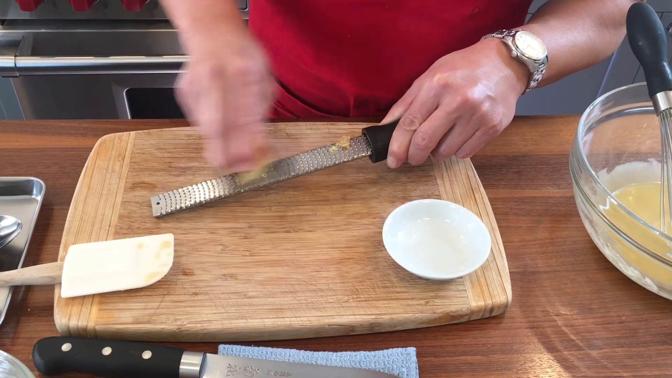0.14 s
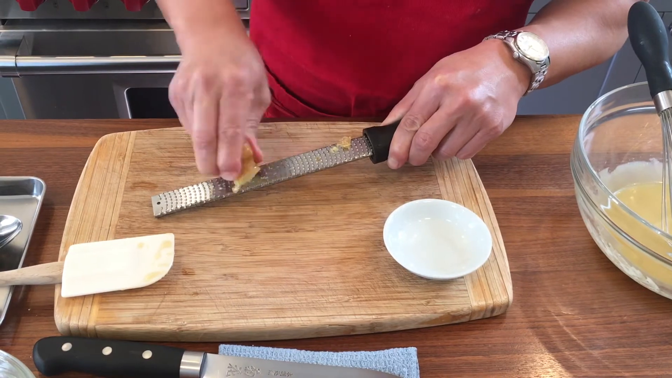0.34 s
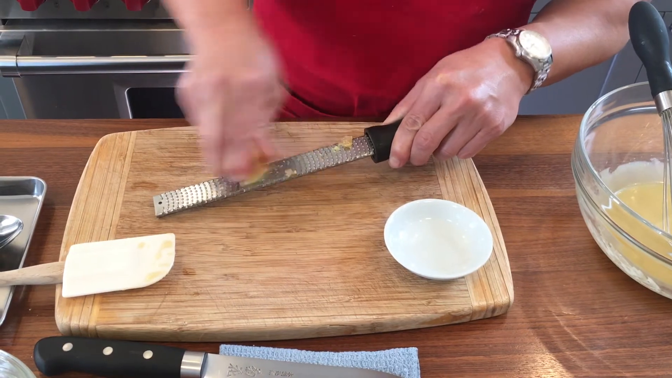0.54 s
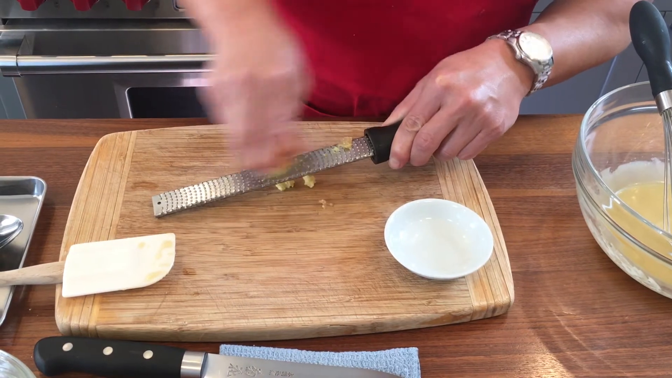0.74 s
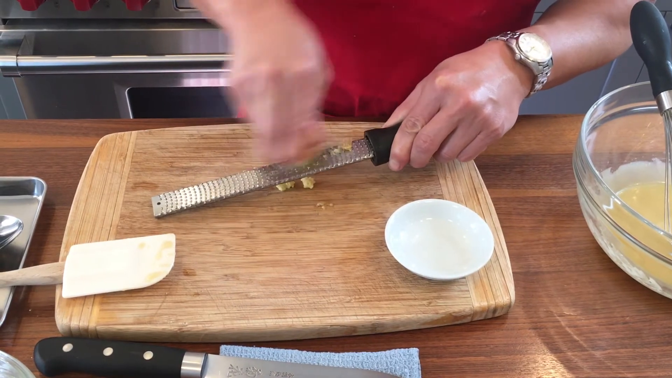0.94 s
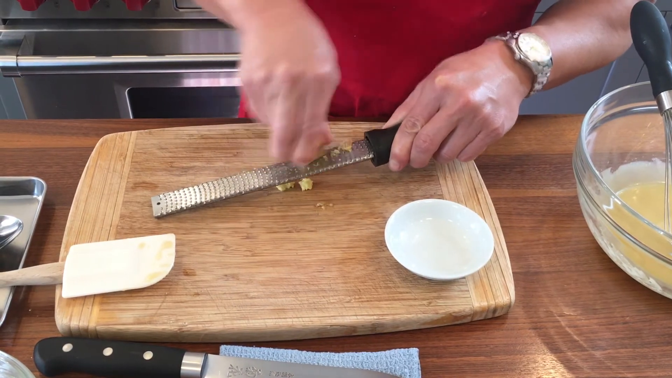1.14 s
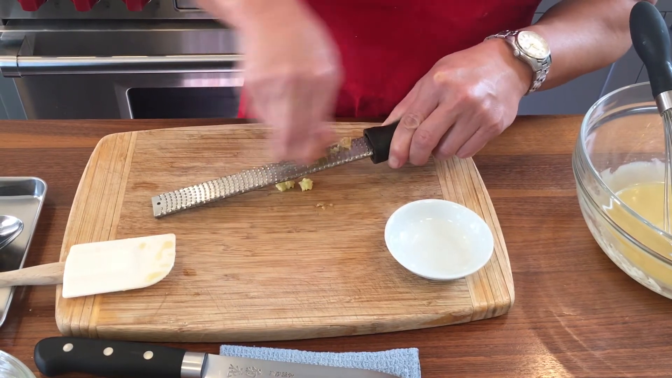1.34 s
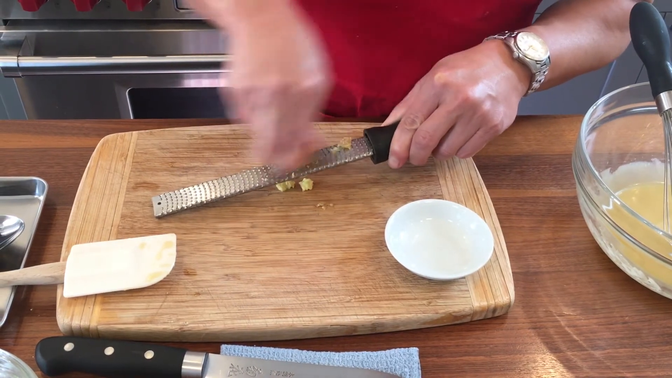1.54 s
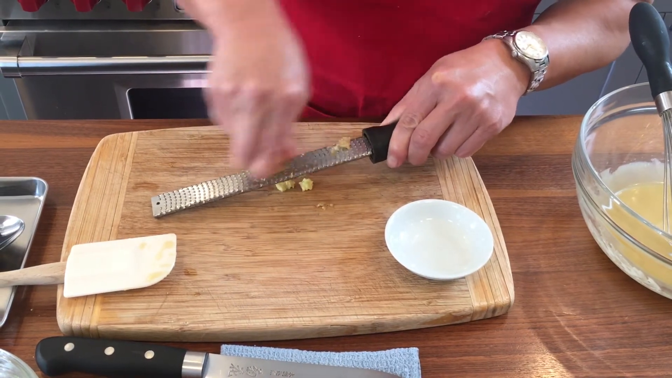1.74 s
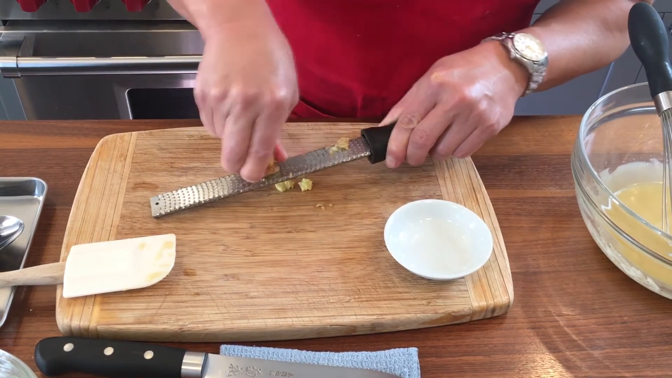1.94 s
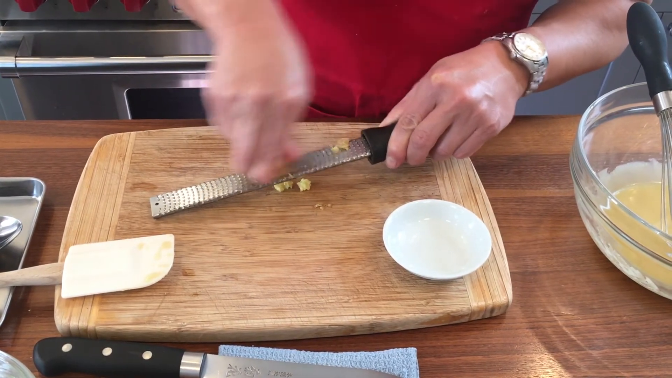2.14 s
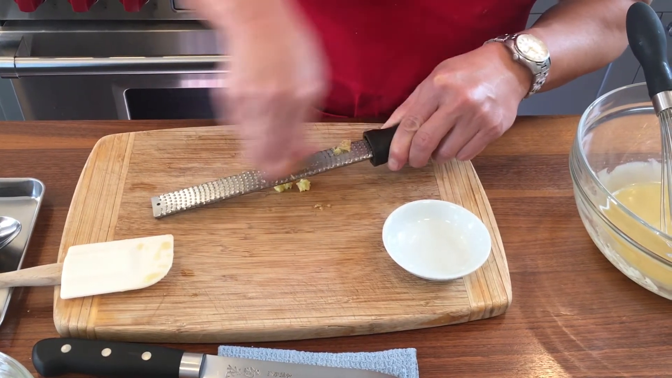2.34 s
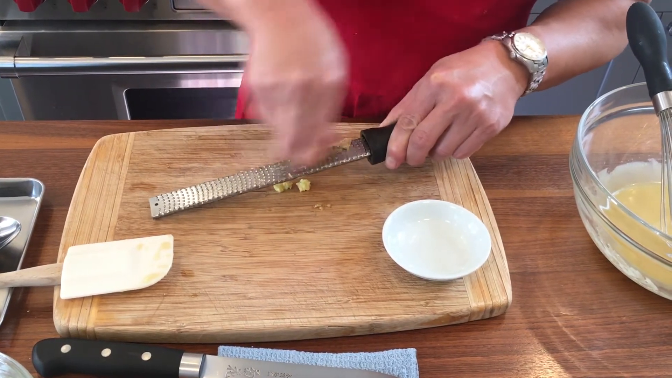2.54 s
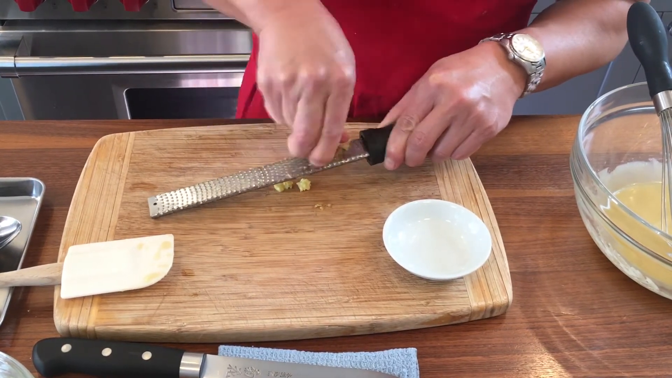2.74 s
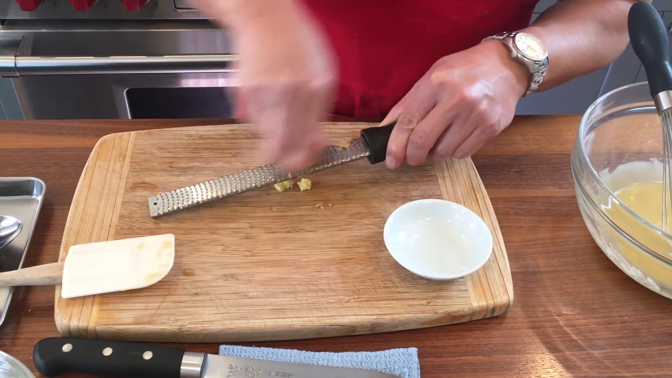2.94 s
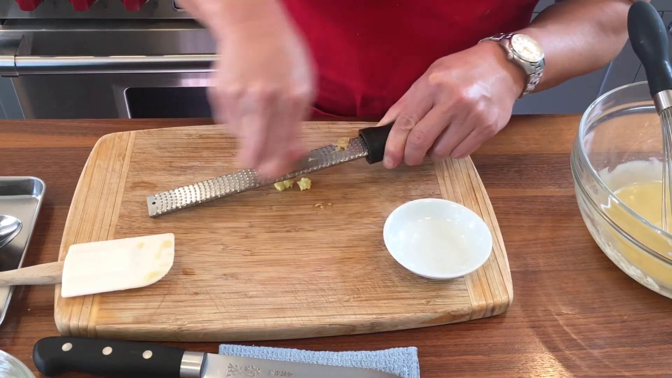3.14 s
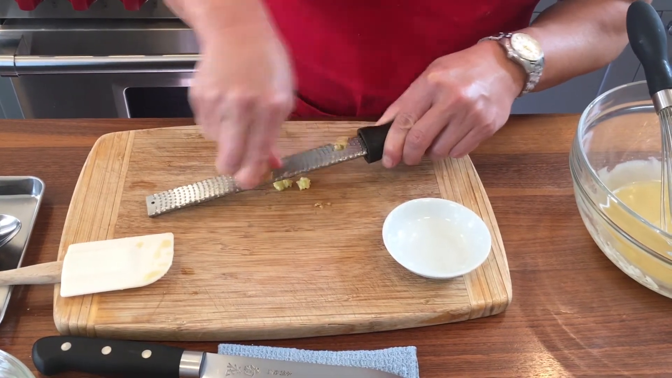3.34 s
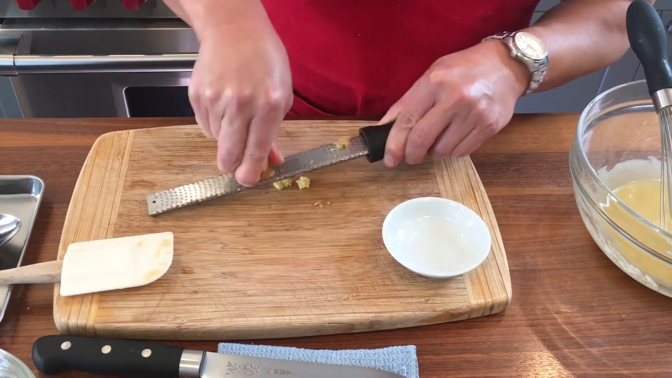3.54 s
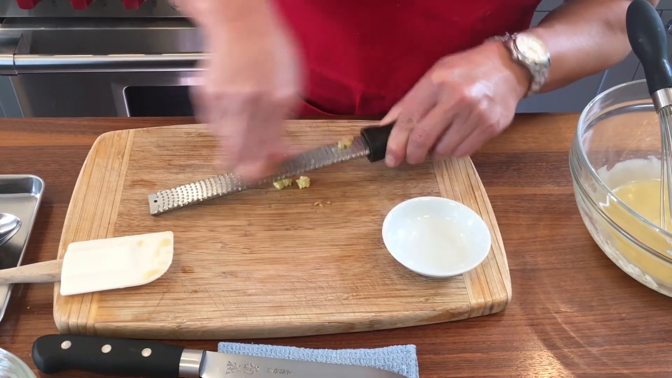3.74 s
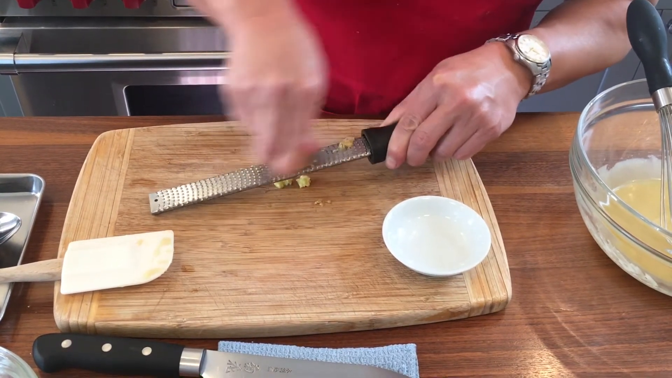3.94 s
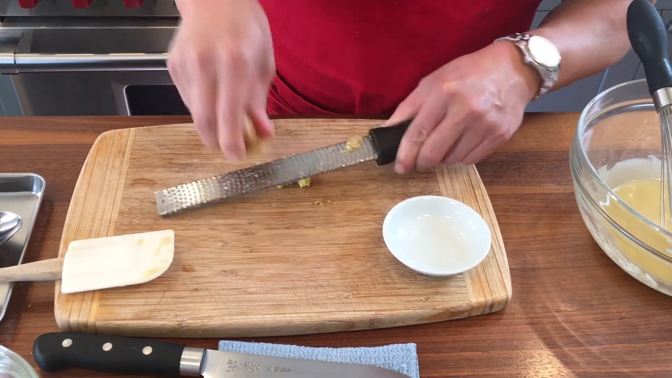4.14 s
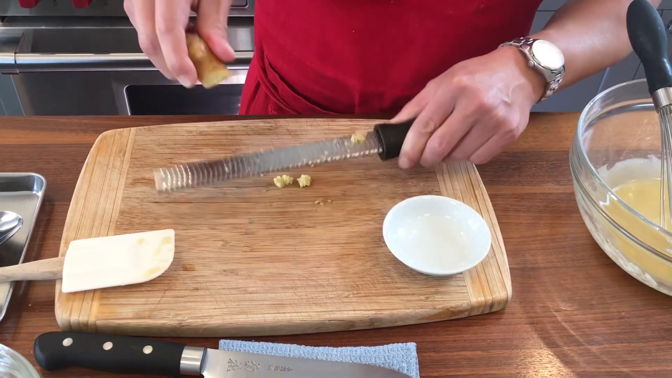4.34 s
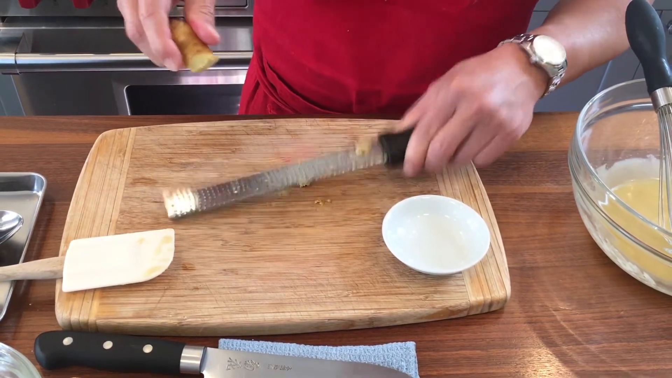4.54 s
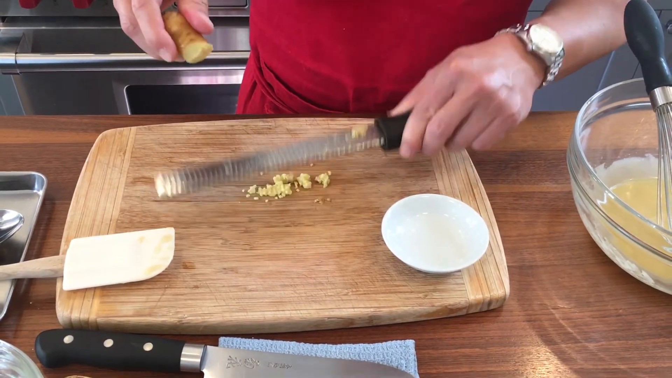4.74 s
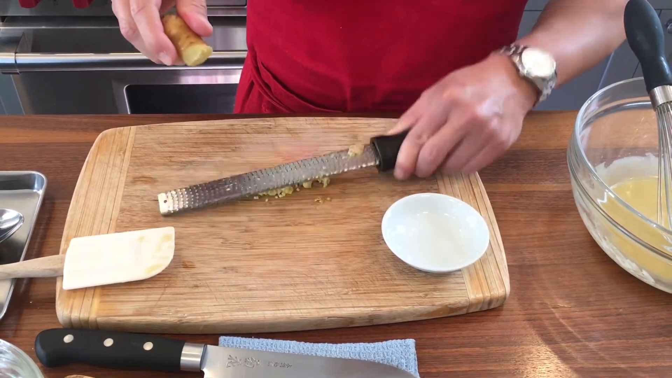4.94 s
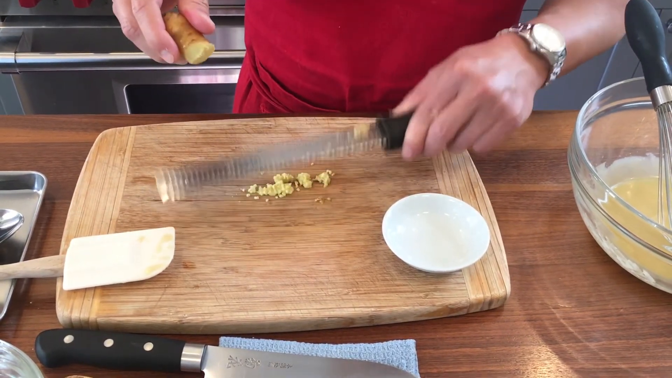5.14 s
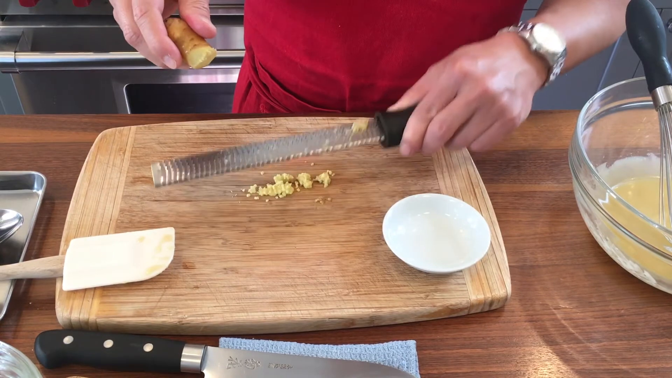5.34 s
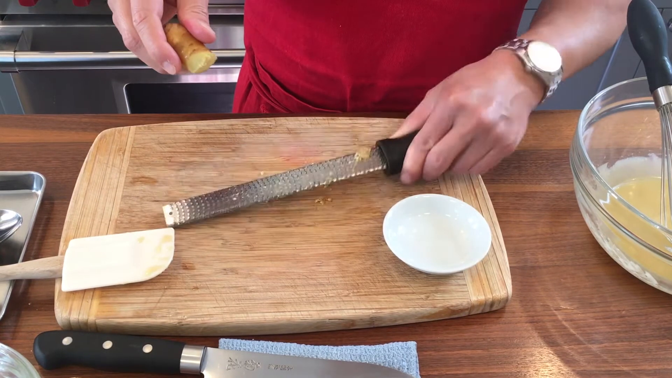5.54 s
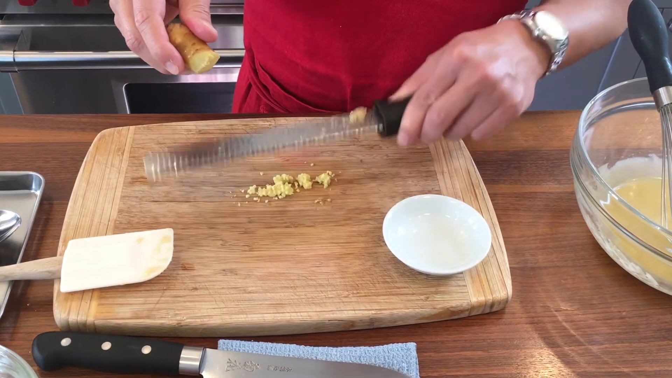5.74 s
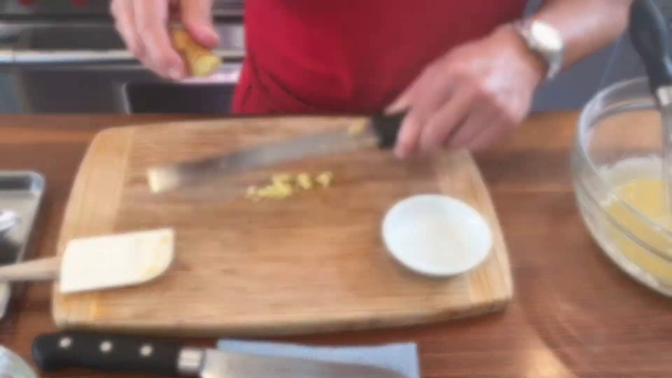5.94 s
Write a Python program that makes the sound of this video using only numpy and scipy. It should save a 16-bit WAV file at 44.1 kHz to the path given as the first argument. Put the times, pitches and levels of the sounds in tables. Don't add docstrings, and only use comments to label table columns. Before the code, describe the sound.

In a hard-walled kitchen, quick raspy grating strokes gradually dull, stop, and give way to six loud, evenly spaced woody clacks.

```python
import sys
import numpy as np
from scipy import signal
from scipy.fft import rfft, irfft
from scipy.io import wavfile
from scipy.ndimage import uniform_filter1d

SR = 44100
rng = np.random.default_rng(int(sys.argv[2]) if len(sys.argv) > 2 else 0)


def nominal_scale(level):
    x = np.asarray(level, float) / 20
    return 10 ** x


def store_pcm(level_fs):
    pcm = np.round(np.clip(level_fs, -1, 1) * 32767).astype(np.int16)
    wavfile.write(sys.argv[1], SR, np.atleast_2d(pcm).T)


N = 269010
T = np.arange(N) / SR
HALF = SR // 2


def evened(x):
    return x / np.sqrt(np.mean(x ** 2) + 1e-20)


def drift(samples):
    once = uniform_filter1d(rng.standard_normal(N), samples)
    return evened(uniform_filter1d(once, samples))


def read(points, hz):
    f, value = np.transpose(points)
    return np.interp(np.log(hz + 1), np.log(f + 1), value)


def stroke(start, length, rise_s, fall_s):
    edges = np.clip([(start - T) / rise_s, (T - start - length) / fall_s], -50, 50)
    return (1 / (1 + np.exp(edges))).prod(0)


def resonate(x, hz, width):
    turn = np.exp(2j * np.pi * np.cumsum(hz * np.ones(N)) / SR)
    r = np.exp(-np.pi * width / SR)
    smooth = signal.lfilter([(1 - r) ** 2], [1, -2 * r, r * r], x / turn)
    return 2 * (turn * smooth).real


def bank(x, peaks):
    total = np.zeros(N)
    for k, (hz, width, db) in enumerate(peaks):
        flicker_db = 2.5 * drift(600)
        total += (-1) ** k * nominal_scale(db + flicker_db) * resonate(x, hz, width)
    return evened(total)


def rung(modes, spread_db):
    hz, db, t60 = np.transpose(modes)[:, :, None]
    db = db + spread_db * rng.standard_normal(db.shape)
    t60 = np.minimum(t60, np.minimum(.2, 270 / hz))
    t = T[:HALF]
    ring = (nominal_scale(db - 60 * t / t60) * np.sin(2 * np.pi * hz * t)).sum(0)
    return ring / np.linalg.norm(ring)


def coloured(points):
    log_gain = np.log(nominal_scale(read(points, abs(np.fft.fftfreq(4096, 1 / SR)))))
    click = np.fft.ifft(np.exp(np.conj(signal.hilbert(log_gain)))).real[:2048]
    return click / np.linalg.norm(click)


def room_air():
    # frequency in Hz, level in dB per Hz.
    floor = [(20, -41), (40, -9), (60, -3.5), (90, -24.5), (130, -9), (200, -8), (420, -14.5), (520, -24.5),
             (800, -27), (2000, -30.5), (3000, -39.5), (5000, -39), (10000, -44.5), (16000, -49)]
    frames, hz = N // 512 + 5, np.fft.rfftfreq(2048, 1 / SR)
    a, b, patches = rng.standard_normal((frames, 1025, 3)).T
    patches = evened(uniform_filter1d(uniform_filter1d(patches, 10, 0), 8, 1))
    z = (a + 1j * b) * nominal_scale(read(floor, hz)[:, None] + 2.0 * patches)
    return nominal_scale(-60.5 - 4.5) * evened(signal.istft(z, nperseg=2048, noverlap=1536)[1][:N])


def fridge():
    # frequency in Hz, width in Hz, level in dB.
    tone = (120, 15.3, -69)
    hz, width, db = tone
    return nominal_scale(db) * evened(resonate(rng.standard_normal(N), hz, width))


def counter_boom():
    # start in seconds, length in seconds, level in dB.
    shoves = [(0.035, 0.042, -59), (0.206, 0.13, -64.5), (0.442, 0.046, -63), (0.528, 0.03, -64),
              (0.593, 0.2, -63.5), (0.837, 0.044, -62.5), (0.95, 0.086, -62), (1.226, 0.042, -62),
              (1.368, 0.2, -60.5), (1.648, 0.032, -61.5), (1.781, 0.055, -63), (2.108, 0.051, -65),
              (2.232, 0.04, -59), (2.483, 0.06, -60), (2.741, 0.1, -61), (2.895, 0.046, -63),
              (2.962, 0.038, -61.5), (3.02, 0.094, -64), (3.484, 0.098, -67.5), (3.64, 0.042, -61),
              (3.868, 0.042, -64), (3.955, 0.085, -61.5), (4.096, 0.087, -63), (4.21, 0.066, -60)]
    ease_s, rest_db, shove_db = 0.006, -81, 1
    note_hz = 189.8 + 8.9 * drift(500)
    lean = nominal_scale(rest_db)
    for start, length, db in shoves:
        lean = lean + nominal_scale(db + shove_db) * stroke(start, length, ease_s, ease_s)
    return lean * np.cos(2 * np.pi * np.cumsum(note_hz) / SR)


def kitchen(x, tail_db, echo_db):
    # frequency in Hz, time to die by 60 dB in seconds.
    dying = [(100, 0.4), (260, 0.27), (700, 0.52), (1400, 0.46), (1900, 0.35), (2500, 0.57), (3200, 0.37),
             (4850, 0.29), (8000, 0.19), (12800, 0.23)]
    # delay in seconds, level in dB.
    echoes = [(.0035, -9.5), (.0075, -4), (0.012, -10), (0.015, -34), (0.023, -23.5)]
    taps = np.zeros(SR)
    at = np.arange(300, SR - 20, 20)
    taps[at + rng.integers(0, 20, len(at))] = rng.choice([-1., 1.], len(at))
    hz, t, z = signal.stft(taps, SR, nperseg=256)
    fade = nominal_scale(-60 * t / read(dying, hz)[:, None])
    tail = signal.istft(z * fade, SR, nperseg=256)[1]
    tail *= nominal_scale(tail_db) / np.linalg.norm(tail)
    for delay, db in echoes:
        tail[round(delay * SR)] += nominal_scale(db + echo_db)
    return x + signal.fftconvolve(x, tail)[:N]


def chatter():
    t = T[:1024]
    landing = (1 - np.exp(-(t / 0.0014) ** 2)) * np.exp(-(t / 0.0067) ** 6)
    touches = np.sign(rng.standard_normal(1024)) * (rng.random(1024) < .3)
    spectrum = rfft(landing * touches, 4096)
    spectrum /= np.sqrt(uniform_filter1d(abs(spectrum) ** 2, size=14))
    return landing * irfft(spectrum)[:1024]


def knocks():
    # start in seconds, then blow, thud, clack and hollow levels in dB.
    blows = [
        (4.554, -16, -8, 0.1, -0.5),
        (4.872, -13, -12.5, 1, 2),
        (5.18, -14, -9.5, 0.2, -3.5),
        (5.469, -12, -10, 0.4, -2),
        (5.761, -15, -5.5, 3.8, 6),
        (6.031, -14.5, -6, 2.2, -0.5),
    ]
    # frequency in Hz, level in dB, time to die by 60 dB in seconds.
    board = [(925, -12, .2), (1020, -4, .24), (1126, -6, .1), (1299, -5, .2), (1340, -8, .2),
             (1376, -8, .18), (1459, 1, .11), (1665, -8, .15), (1741, -7, .08), (2010, -10, .18),
             (2190, -9, .15), (2235, -5, .1), (2350, -9, .15), (2445, -11, .15), (2510, -8, .15),
             (2660, -9, .08), (3000, -16, .1), (3365, -12, .1), (3541, -10, .1), (3700, -12, .08)]
    blade = [(3300, 0, .025), (4170, 4, .02), (4600, -9, .025), (5500, -6, .02), (6150, -6, .025),
             (6650, -6, .022), (7150, -9, .025)]
    counter = [(81, -13, 0.114), (114, -14.5, .12), (145.6, 6, 0.16), (190.4, 17.5, 0.087),
               (222, -21, 0.066), (308.3, 6.5, 0.14), (474, -10, 0.115)]
    # frequency in Hz, level in dB per Hz.
    crack = [(150, -35.5), (400, -18.5), (700, -16.5), (1000, -1), (1500, 3.5), (2500, -4), (3400, -5),
             (3900, -12.5), (4300, -15), (5000, -12.5), (7000, -17), (7700, -19.5), (13500, -27.5),
             (16500, -28)]
    out, hz = np.zeros(N + SR), np.fft.rfftfreq(HALF, 1 / SR)
    lead = 100
    for start, blow_db, thud_db, clack_db, hollow_db in blows:
        contacts = chatter()
        contacts = contacts + nominal_scale(-24) * np.roll(contacts, round(0.012 * SR))
        contacts /= np.linalg.norm(contacts)

        struck = nominal_scale(14.5) * rung(board, 4.44) + nominal_scale(4.5) * rung(blade, 0.97)
        struck[:2048] += nominal_scale(16.0) * coloured(crack)
        clack = np.roll(signal.fftconvolve(contacts, struck)[:HALF], lead)
        hollow = [(480, hollow_db), (650, hollow_db - 8), (850, hollow_db), (1050, 0.01)]
        bright = [(1900, 0.0092), (2400, clack_db), (3500, clack_db), (4300, clack_db + 2.17)]
        sound = irfft(rfft(clack) * nominal_scale(read(hollow + bright, hz)))

        push = np.r_[np.zeros(210), np.diff(signal.windows.hann(240)) / 3]
        sound += nominal_scale(thud_db + 23.5) * signal.fftconvolve(push, rung(counter, 0.96))[:HALF]
        out[round(start * SR) - lead:][:HALF] += nominal_scale(blow_db) * sound
    return out[:N]


def rubbing(rows, bite_s):
    firm_db, lift_s = -60, .0023
    ring_db, ring_follows = -4.5, 0.76
    body_db, body_follows = -3, 0.61
    fizz, ring, body = np.zeros((3, N))
    for start, length, start_db, end_db in rows:
        press_db = np.interp(T, [start, start + length], [start_db, end_db])
        press = stroke(start, length, bite_s, lift_s) * nominal_scale(press_db)
        eased_db = firm_db - (start_db + end_db) / 2
        fizz += press
        ring += press * nominal_scale(ring_db + (1 - ring_follows) * eased_db)
        body += press * nominal_scale(body_db + (1 - body_follows) * eased_db)
    return np.array([fizz, ring, body])


def snapping():
    judder = nominal_scale(0.5 * drift(120))
    snapped = rng.random(N) < 14000 / SR
    size = nominal_scale(3.37 * np.minimum(rng.exponential(1, N), 5))
    return judder * rng.choice([-1., 1.], N) * size * snapped


def grating():
    # start in seconds, length in seconds, pressure at start and at end in dB.
    cuts = [(0.0, 0.085, -56.5, -58), (0.255, 0.076, -57.5, -51.5), (0.483, 0.07, -54.5, -54),
            (.708, 0.071, -55.5, -58), (.931, 0.073, -58, -60.5), (1.153, 0.071, -64, -61),
            (1.399, 0.069, -59.5, -63.5), (1.622, 0.077, -64.5, -61.5), (1.856, 0.063, -62.5, -62),
            (2.095, 0.063, -63, -62), (2.322, 0.058, -60, -60.5), (2.543, 0.065, -63.5, -60.5),
            (2.78, 0.074, -62.5, -61.5), (3.016, 0.064, -62, -62), (3.244, 0.069, -61.5, -63),
            (3.468, 0.06, -63.5, -60.5), (3.698, 0.078, -61.5, -62), (3.921, .094, -67.5, -63)]
    returns = [(0.123, 0.085, -68, -57), (0.367, 0.067, -66, -53), (0.597, 0.071, -68, -60),
               (0.821, 0.077, -66, -68), (1.046, 0.067, -67, -67.5), (1.279, 0.085, -69.5, -68),
               (1.519, 0.075, -62.5, -71), (1.734, 0.081, -73.5, -67.5), (1.979, 0.08, -69.5, -70),
               (2.216, 0.074, -67, -71.5), (2.425, 0.086, -70, -66), (2.668, 0.076, -68.5, -68),
               (2.896, .089, -65.5, -68), (3.131, 0.084, -70.5, -68), (3.359, 0.081, -66, -70),
               (3.582, .089, -67.5, -65), (3.812, .073, -61, -72), (4.203, .031, -74, -81)]
    # frequency in Hz, width in Hz, level in dB.
    teeth = [(5000, 3300, -4), (6560, 1180, -0.5), (6950, 810, 2), (9300, 3100, -3.5), (10730, 3500, -5.5),
             (12960, 5400, -4.5), (15900, 2100, -9)]
    ring = [(3114, 240, 2.5), (3434, 265, 7.5), (3650, 270, 2)]
    free_ring = [(4200, 300, -2), (4560, 260, 0)]
    body = [(373, 140, 1), (930, 1150, -9.5), (1247, 500, -1.5), (1475, 590, -3), (2346, 400, -2.5),
            (2755, 250, -6.5)]
    # time in seconds, gain in dB.
    clogging = [(0, -1), (.9, 0), (1.3, -3.5), (2.5, -6.5), (4.3, -5.5)]
    fizz_push, ring_push, body_push = rubbing(cuts, .0026) + rubbing(returns, .0045)
    snaps = snapping()

    starts = np.sort(np.transpose(cuts + returns)[0])
    place = -np.cos(np.pi * np.interp(T, starts, np.arange(len(starts))))
    high = nominal_scale(2.5) * evened(resonate(snaps, 4220 * (1 + .07 * place), 620))
    low = nominal_scale(-4) * evened(resonate(snaps, 1750 * (1 - .17 * place), 480))

    clog = nominal_scale(np.interp(T, *np.transpose(clogging)))
    free = nominal_scale(-4) * bank(np.roll(snaps, 900), free_ring) + high
    steady = nominal_scale(-3.0) * bank(np.roll(snaps, 300), ring) / clog ** .7
    blade = steady + clog * free
    under = bank(np.roll(snaps, 600), body) + low
    fizz = bank(np.roll(snaps, 150), teeth)
    return fizz_push * fizz + ring_push * blade + body_push * under


def scene():
    background = room_air() + fridge() + counter_boom()
    rasp = nominal_scale(-0.5) * grating()
    board = nominal_scale(-3) * knocks()
    spot = (T - 4.5) // .295 % 3
    grated, knocked = np.zeros((2, N))
    for k in range(3):
        turn = np.cos(np.pi * (3.1 * T + k / 3)) ** 2 / 1.5
        grated += kitchen(rasp * turn, -4.5, -15)
        knocked += kitchen(board * (spot == k), -7.5, -5.5)
    return (grated + knocked + background)[None]


def top_cut(x):
    return signal.sosfilt(signal.butter(12, 16810, fs=SR, output="sos"), x)


def record(dry):
    thin = signal.sosfilt(signal.butter(2, 60, "high", fs=SR, output="sos"), dry)
    thin = .42 * np.tanh(thin / .42)
    low_pass = signal.firwin(511, 15800, window=("kaiser", 9), fs=SR)
    mix = signal.oaconvolve(thin, low_pass[None], "same")
    return top_cut(mix)


dry = scene()
out = record(dry)
store_pcm(out)
```